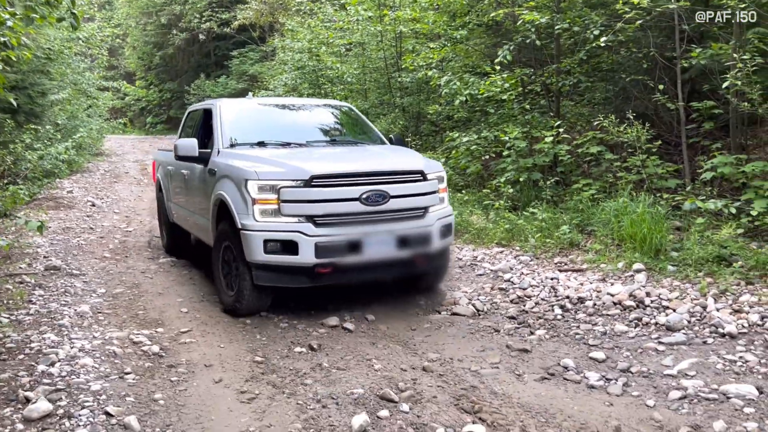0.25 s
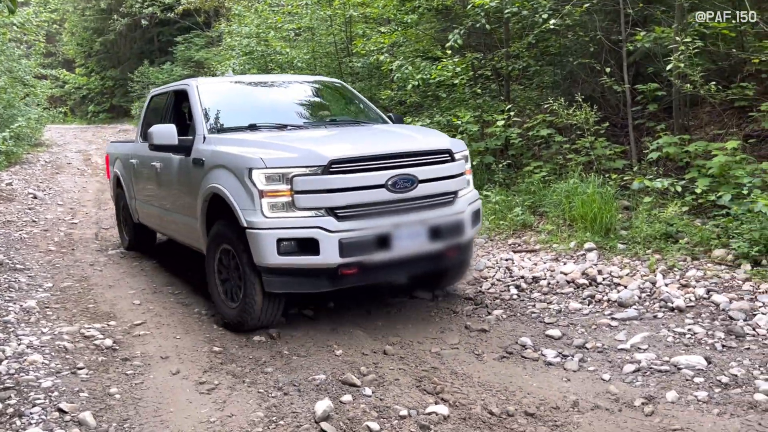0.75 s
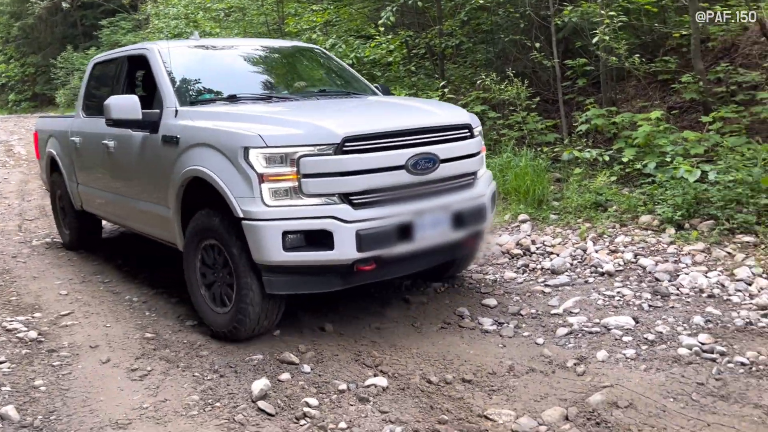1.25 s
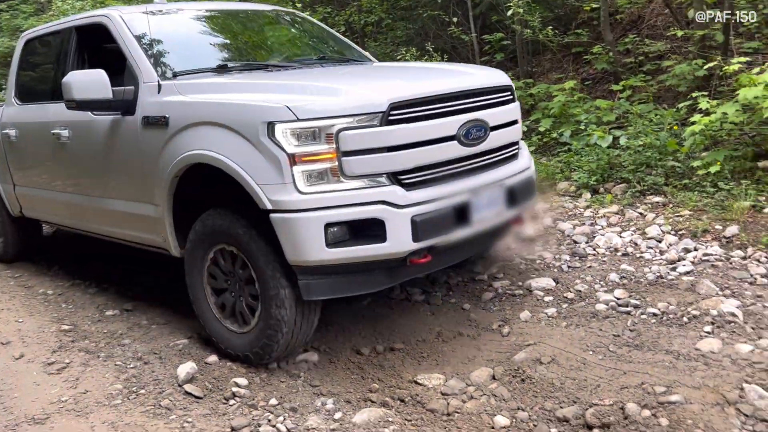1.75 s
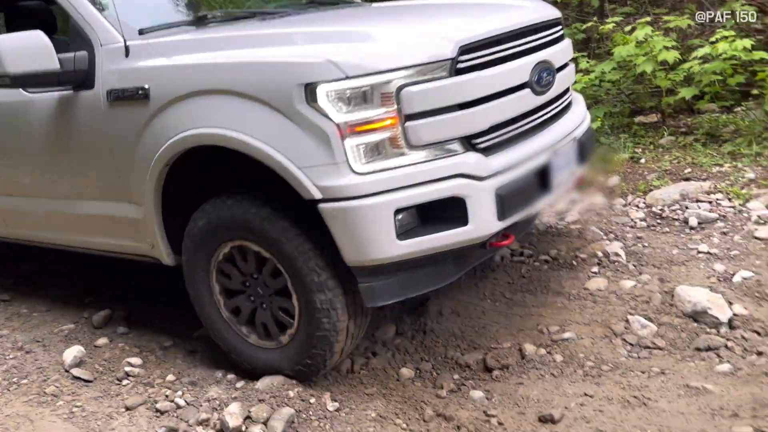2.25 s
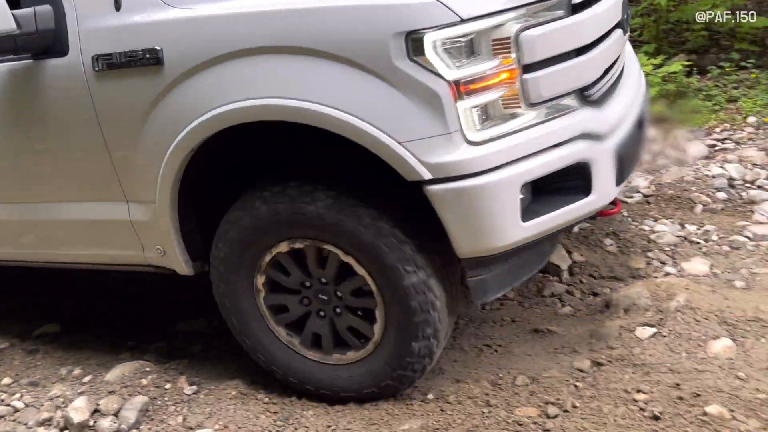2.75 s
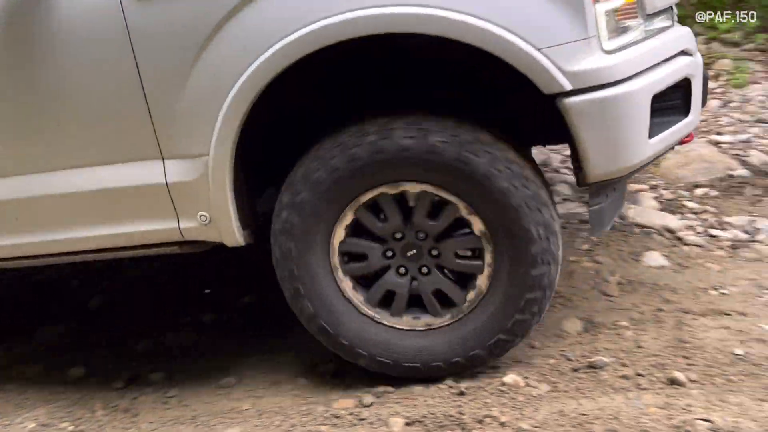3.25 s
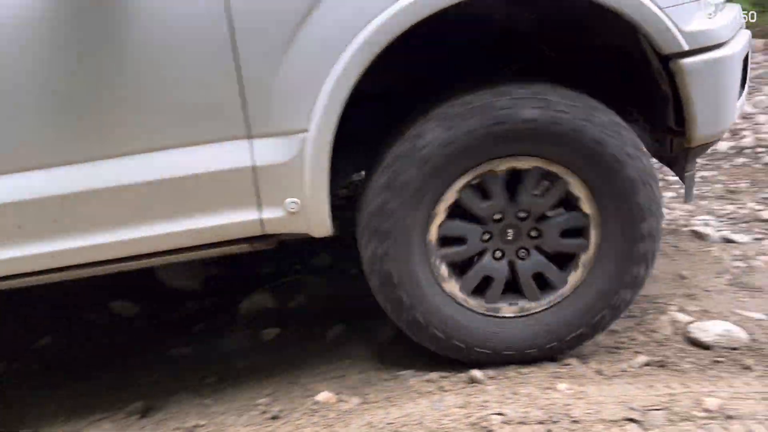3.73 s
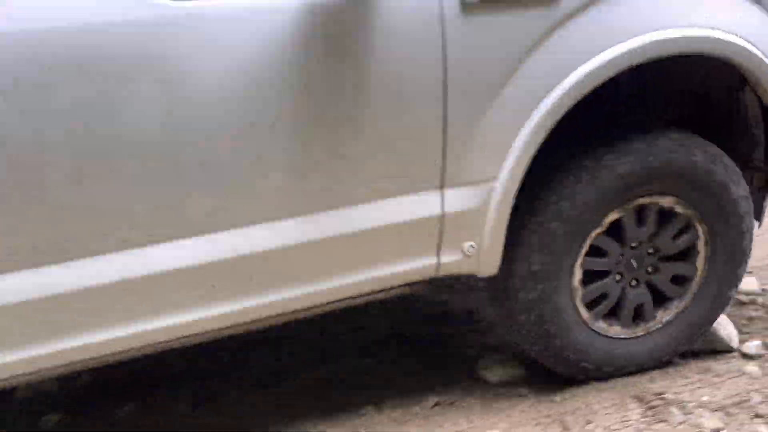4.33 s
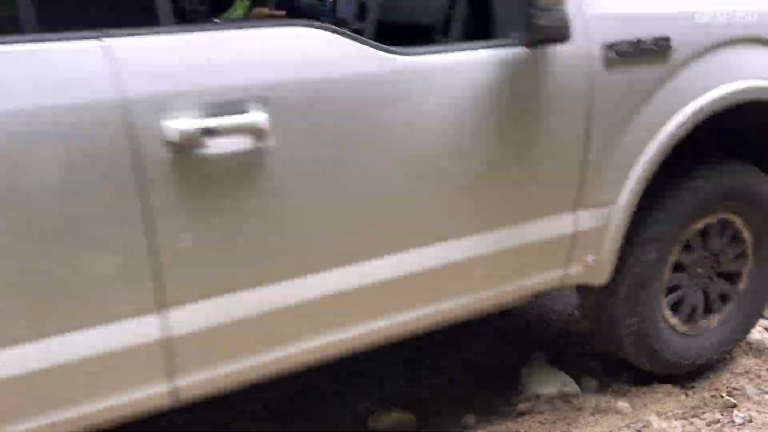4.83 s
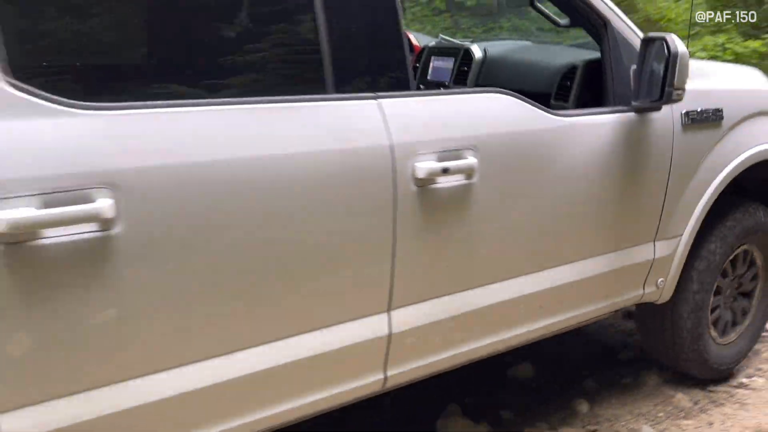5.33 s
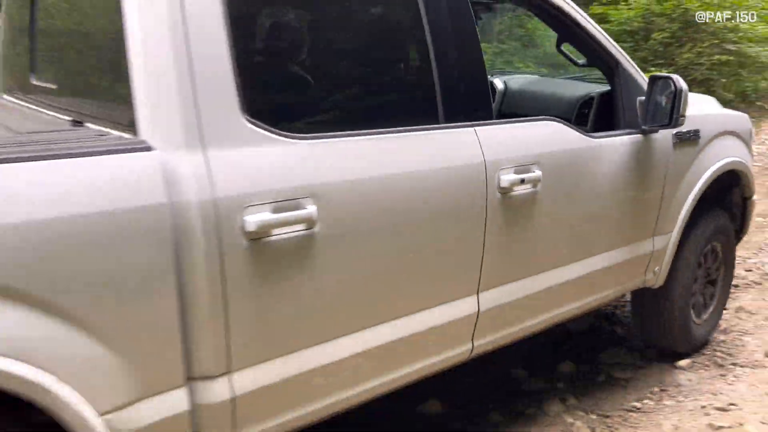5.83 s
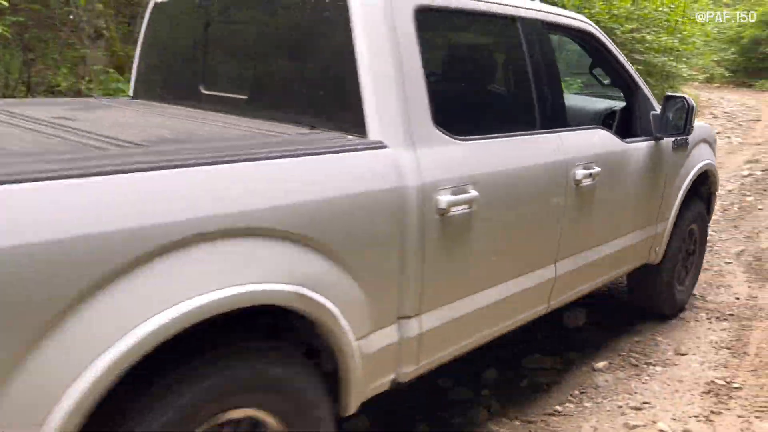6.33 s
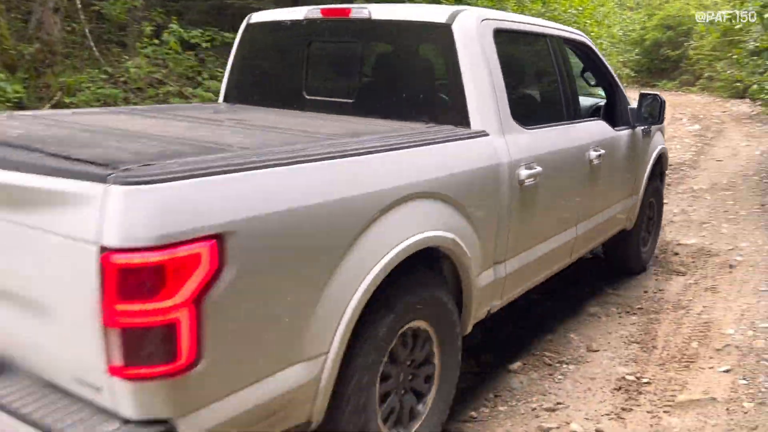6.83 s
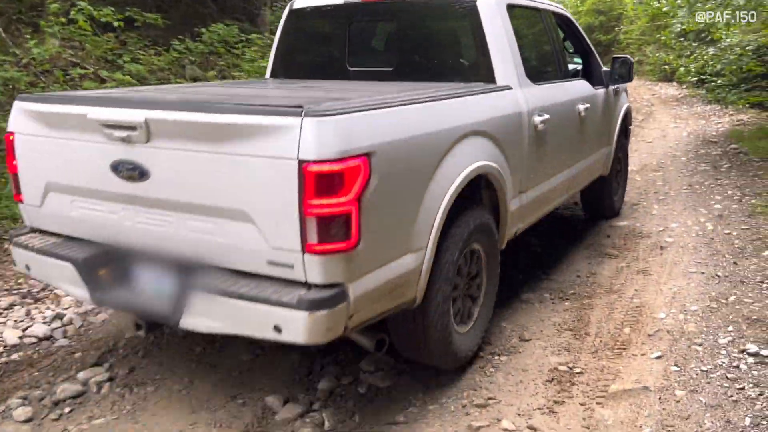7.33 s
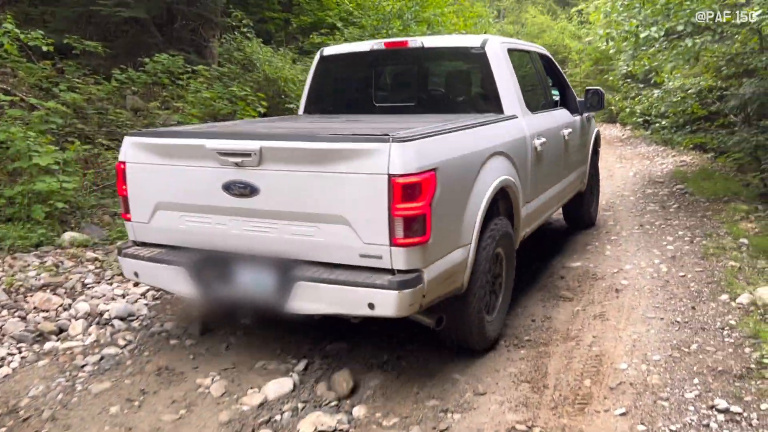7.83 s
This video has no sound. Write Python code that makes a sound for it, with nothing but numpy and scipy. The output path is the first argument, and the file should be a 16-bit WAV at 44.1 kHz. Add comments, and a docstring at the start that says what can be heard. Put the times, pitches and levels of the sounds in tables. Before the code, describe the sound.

Slow tyres crunch loose gravel close by, rocks clack, wheels thud off larger stones, and a low throbbing engine rolls past and away.

```python
"""The tyres of a pickup truck crawl past, close by, over a rocky forest road: stones knock, crack and scrape.
Knocks, cracks and scrapes are short blows or slips that ring; gravel is many tiny ticks mixed with noise.
The wheels boom as they drop off larger rocks. The six-cylinder engine is a stack of sine waves that follows
the throttle, with a throbbing exhaust; the ground and the forest scatter the sound. On the left, a narrow
band of noise near 6 kHz drifts in pitch."""
import sys
import numpy as np
from scipy import signal
from scipy.fft import rfft, irfft, next_fast_len
from scipy.io import wavfile
from scipy.ndimage import uniform_filter1d

SR = 44100
rng = np.random.default_rng(int(sys.argv[2]) if len(sys.argv) > 2 else 0)


def pcm_store(signal):
    """Save signal as 16-bit PCM."""
    levels = np.round(np.clip(np.atleast_2d(signal), -1, 1) * 32767)
    wavfile.write(sys.argv[1], SR, levels.astype(np.int16).T)


N = 356372  # length in samples
TIME = np.arange(N) / SR  # seconds

# Levels in the tables are relative: the functions that use them may add a further gain.

# Surroundings
# fading of the forest scatter: pitch_hz, fade_by_60_db_s
FOREST = [(100, 0.3), (1000, 0.19), (4000, 0.16), (16000, 0.064)]
# echo of the rolling off the ground; its delay mostly shortens as the truck moves by:
# time_s, delay_ms, strength_0_to_1
GROUND_ECHO = [(0, 1.23, 0.67), (.9, 1.27, 0.35), (1.5, 1.2, 0.24), (2.5, 1.06, 0.2), (3.3, 0.98, 0.08),
               (3.9, 1.07, 0), (4.7, 1.02, 0), (5.25, 0.91, 0.3), (6, 0.67, 0.05), (7.6, 0.84, 0.03)]
ECHO_TOP_HZ = 3180  # the rough ground scatters the treble

# Narrow hiss
# narrow drifting hiss near 6 kHz on the left, before its flicker: time_s, level_db, centre_hz
HISS = [(0, -56, 5900), (1, -52, 5840), (2.3, -45.5, 5800), (3.5, -49.5, 5830), (5, -52.5, 6380),
        (5.6, -51.5, 6393), (6.2, -43, 6450), (6.7, -44, 6300), (7.2, -75, 6010), (8.08, -71, 5907)]
# shape of the hiss on each side of its centre: distance_from_centre_hz, level_db
HISS_SKIRT = [(20, 4), (350, 0), (700, -7), (1200, -16)]

# Engine
# firing rate, before a slight unsteadiness: time_s, firing_rate_hz
FIRING = [(0.0, 67.6), (0.55, 65.3), (1.0, 75.85), (1.3, 80.63), (1.75, 75.1), (2.35, 70.8), (2.78, 71.8),
          (3.22, 81.7), (3.46, 81.15), (3.8, 72.75), (4.16, 79.86), (4.5, 78.46), (5.08, 72.38), (5.35, 74),
          (5.75, 86.73), (6.0, 93.5), (6.25, 94.2), (6.57, 87.9), (6.8, 68.6), (7.18, 82.4), (7.38, 79.4),
          (7.88, 63.96), (8.08, 61)]
# the engine comes near and goes by, at cruising revs: time_s, firing_hum_db, overtones_db
ENGINE_PASS = [(0, -42, -55), (.08, -42.5, -46), (.5, -35, -42.5), (.85, -30, -41.5), (1.4, -26, -38),
               (2.3, -25, -35), (2.8, -19.5, -30), (3.7, -19, -33.5), (4.5, -23.5, -30), (5.1, -21, -30),
               (6.65, -19.5, -42.5), (6.95, -23.5, -39.5), (7.6, -21, -35.5), (8.08, -35.5, -43)]
# resonances of the engine bay that the overtones sweep through: pitch_hz, level_db
BLOCK = [(120, 20), (145, -15), (170, -16), (210, -12.5), (238, 0), (270, -5.5), (320, -20.5), (345, -12),
         (366, -1), (385, -8.5), (410, -9), (480, -10.5), (570, -18), (700, -9.5)]
# tailpipe tones, uneven between the two cylinder banks: multiple_of_firing_rate, level_db
PIPE = [(.5, -30), (1.5, 3), (2, -4.5), (2.5, -6), (3.5, -13), (4, -11.5)]
# how much of the tailpipe is heard: time_s, level_db
TAIL = [(0, -44), (2, -41.5), (5, -41), (6.3, -43), (6.8, -37.5), (7.3, -33.5), (7.8, -39.5), (8.08, -33)]
CRUISE_HZ = 75
HUM_DB_PER_HZ, BLOCK_DB_PER_HZ = -0.2453, 0.4129  # more throttle: less hum, stronger overtones

# Rolling tyres
# steady rolling, louder as each axle passes: time_s, stones_db, pebbles_db, grit_db
ROAD = [(0, -45, -52, -59), (.08, -35.5, -47, -48.5), (.66, -37, -42, -49), (.85, -28.5, -35.5, -41.5),
        (1.1, -33.5, -35.5, -41), (1.55, -31.5, -38, -44.5), (2.25, -28.5, -37.5, -40.5),
        (2.7, -28, -32.5, -37), (3.55, -22, -31, -38), (4, -29, -32.5, -41.5), (4.35, -22.5, -31.5, -37),
        (5.05, -28.5, -35.5, -42.5), (5.75, -28.5, -36.5, -41.5), (6.05, -20, -33.5, -36),
        (6.6, -21, -31, -41.5), (6.95, -29, -39.5, -42.5), (7.4, -29, -38, -45), (7.55, -30, -37.5, -47.5),
        (7.8, -41, -43.5, -50.5), (8.08, -36.5, -40.5, -52.5)]
# the ground shakes as the axles pass: time_s, level_db
GROUND = [(0, -52), (2.6, -42), (3.7, -42), (4.05, -36.5), (4.3, -30.5), (4.85, -30.5), (5.2, -40.5),
          (5.7, -36), (6.3, -28), (6.7, -28), (7.1, -41), (7.75, -43), (8.08, -53)]
# tyre crushing a patch of loose gravel: start_s, length_s, level_db, grit_against_stones_db
CRUNCHES = [(0.693, 0.076, -22.5, -19.5), (0.81, .05, -27.5, -20), (0.91, 0.03, -27, -11),
            (1.174, 0.049, -24, -19), (1.662, 0.076, -26, -13), (2.305, 0.23, -24.5, -12),
            (2.596, 0.049, -20, -17), (2.743, 0.15, -27, -17), (3.329, 0.13, -21.5, -17),
            (4.148, 0.17, -15.5, -18), (4.262, 0.11, -23.5, -4.5), (4.399, 0.11, -24.5, -11.5),
            (4.645, 0.068, -14.5, -14), (4.673, 0.21, -21, -14), (5.163, 0.06, -19, -31),
            (5.246, 0.043, -19, -28), (5.544, 0.12, -24, -17.5), (5.817, 0.13, -19.5, -15),
            (5.969, 0.081, -23.5, -9.5), (6.196, 0.14, -20.5, -21), (6.385, 0.17, -18.5, -25),
            (6.566, 0.071, -23, -6), (6.637, 0.13, -18, -23), (7.06, 0.17, -27, -15.5),
            (7.167, 0.035, -23.5, -13), (7.293, 0.084, -24, -12), (7.58, 0.19, -26, -32),
            (7.868, 0.099, -24.5, -19.5)]
CRUNCH_PEAK = 0.18  # share of its length at which a crunch is loudest
CRUNCH_PEBBLES_DB = -1  # against the mean of stones and grit
# spectra of the four layers of rolling: pitch_hz, level_db_per_hz
RUMBLE = [(24, -53), (31, -30), (40, -10), (48, -2.5), (62, -2.5), (100, -4), (150, -12), (250, -18)]
STONES = [(70, -22), (120, 1), (170, -1.5), (250, .5), (410, 1), (600, -4), (950, -9), (1300, -23),
          (2200, -37)]
PEBBLES = [(600, -12), (1000, 3.5), (1500, 2.5), (2150, -1.5), (2650, -11.5), (3400, -12), (4500, -17),
           (7000, -45)]
GRIT = [(2500, 9.5), (4000, 2), (6000, 1.5), (7200, 0), (8700, 0.5), (11500, -2.5), (13500, -7),
        (16000, -7)]
CLUMP_HZ, CLUMP_LONGEST_S = 32.2, 0.14  # how fast the crumbling flickers; its longest clump
SPRAY_DB, SPRAY_CRUNCH = -9.5, 2.04  # flung chips against the grit; how much more steeply they follow it

# Wheels
# wheel dropping off a rock: start_s, level_db, pitch_as_multiple_of_wheel_modes
THUMPS = [(0.703, -21.5, .7), (3.661, -17.5, 0.8), (4.184, -15, 0.96), (4.213, -10.5, 0.72),
          (4.307, -21, 0.8), (4.513, -26, .9), (4.743, -10, 0.74), (6.699, -11.5, 0.82), (7.066, -13, 0.72),
          (7.578, -7.5, 1.0)]
# modes of tyre and wheel arch, before the pitch multiple: pitch_hz, level_db, fade_by_60_db_s
WHEEL = [(62.6, -15, 0.072), (112.7, -6.5, 0.25), (154.5, 4.5, 0.071), (225, -2, 0.081),
         (339.4, 4.5, 0.069), (363, 2, 0.027)]
JOLT_DB, JOLT_S = -21.5, 0.048  # rumble after a drop, against the drop; time to its peak

# Loose rocks
# stones knocked together under a tyre: start_s, level_db, pitch_hz, ring_cycles
KNOCKS = [(.07, -19, 1000, 0.8), (.1, -20, 950, 1.5), (0.155, -15, 1100, 1.1), (.156, -15, 430, 1.4),
          (.169, -23, 900, 1), (0.194, -21, 905, 1.3), (.33, -23, 1100, 0.93), (.39, -14.5, 1350, 1.3),
          (0.7, -10, 1320, 0.93), (0.704, -24, 900, 0.6), (.731, -18, 800, .8), (.829, -16, 1600, 1),
          (.849, -9.5, 604, 1.34), (.921, -16, 750, 1.2), (.933, -14, 950, 1.1), (.994, -12.5, 840, 1.4),
          (1.039, -12, 800, 1.2), (1.175, -15, 900, 0.85), (1.193, -11.5, 750, 1.2), (1.2, -14, 1500, 1.2),
          (1.49, -21, 800, 0.66), (1.673, -15, 603, 1.5), (1.745, -18.5, 1390, 1), (1.971, 1.5, 873, 0.83),
          (1.977, 0, 625, 1.1), (2.009, -9.5, 630, 2.3), (2.045, -7, 640, 1.2), (2.057, -9, 570, 2),
          (2.325, -9, 980, 0.89), (2.393, -9, 600, 0.58), (2.479, -17, 1400, 1), (2.525, -13, 700, 1.4),
          (2.593, 0.5, 1060, 0.9), (2.599, -5, 1130, 1.8), (2.614, -15, 750, 1), (2.626, -10.5, 543, 1.8),
          (2.638, -7.5, 1200, .8), (2.643, -16, 560, 1.8), (2.685, -6.5, 750, 0.58), (2.69, -7, 526, 1.6),
          (2.754, -5.5, 1060, 0.67), (2.771, -10, 1098, 0.93), (2.794, -13, 1200, 0.87),
          (2.802, -4.5, 1110, 0.67), (2.807, -19, 430, 1.2), (2.904, -7, 564, 0.4), (2.933, -7, 900, 0.77),
          (2.985, -10.5, 488, 1.3), (3.037, -2.5, 476, 0.95), (3.184, -11, 560, 1.1),
          (3.347, -8.5, 420, 1.4), (3.392, -8, 480, 1), (3.612, -7, 457, 1), (3.632, -5, 430, 1.3),
          (3.647, -4.5, 760, 0.99), (3.733, -7, 470, 1.1), (3.819, -5, 520, 0.43), (3.919, -9, 530, 1.9),
          (3.978, -18, 684, 1.5), (4.086, -6.5, 490, 0.72), (4.181, -4.5, 434, 2.18), (4.195, -6, 505, 1.2),
          (4.217, -4, 750, 0.85), (4.243, -5, 653.3, 1), (4.255, -5, 960, 1.3), (4.26, -4, 1000, 0.8),
          (4.274, -13, 696, 1.2), (4.472, -11.5, 700, 1), (4.648, -4.5, 1240, 1.5), (4.659, 0, 1210, 1.2),
          (4.667, -1.5, 567, 1.84), (4.673, -9, 900, 1.1), (4.69, -18, 1100, 0.87), (4.702, -12, 900, 1),
          (4.741, -18, 495, 1.4), (4.912, -11.5, 885, 0.65), (5.166, -5, 848, 1), (5.178, -7, 898, 1.2),
          (5.188, -9, 650, 1.8), (5.207, -11, 470, 1.1), (5.261, -5, 693, 1.1), (5.427, -14, 700, 0.7),
          (5.62, -11, 956, 1), (5.842, -16, 700, 1), (5.863, -8, 516, 1.34), (5.889, -0.5, 584, 0.74),
          (5.987, -3.5, 587, 1.8), (6.021, -2, 581.4, 1.3), (6.04, -14, 620, 1.5), (6.07, -9, 541, 1.25),
          (6.12, -12, 800, 1), (6.226, -6.5, 600, 1.15), (6.236, -5, 455.3, 1.8), (6.259, -6, 445, 1),
          (6.329, -3, 462.6, 1.6), (6.364, -4.5, 445.4, 1), (6.582, -5, 822, 1.2), (6.665, -7, 891, 0.68),
          (6.694, -5.5, 434, 2), (7.09, -13, 450, 1.69), (7.136, -15, 950, 0.8), (7.193, -13, 1398, 0.82),
          (7.238, -11.5, 400, 1.7), (7.412, -9.5, 601, 0.71), (7.444, -11.5, 419, 1.4),
          (7.557, -21, 650, 0.77), (7.58, -11, 555, .9), (7.615, -12.5, 905, 1.03), (7.65, -24, 699, 0.99)]
# muffling of the knocks by the rubber: pitch_hz, level_db
KNOCK_COLOUR = [(60, 7.5), (1500, -5.0), (3000, -6), (6000, -37), (16000, -40)]
# stones that crack or flick away: start_s, level_db, pitch_hz, ring_cycles
CRACKS = [(.391, -40, 2500, 0.51), (.696, -30, 4020, .8), (0.703, -24.5, 3200, 0.47),
          (0.815, -20, 3020, 0.36), (.816, -22, 5500, 3), (.824, -30, 5600, 3), (0.932, -24, 4200, 1.1),
          (.994, -34, 2800, 1.5), (1.971, -19.5, 5500, 0.83), (1.979, -27, 5610, 2), (2.261, -32, 5900, 1),
          (2.347, -22, 5900, 2), (2.6, -17.5, 3190, 0.44), (2.615, -23, 3000, .7), (2.638, -17, 2200, 1.6),
          (2.659, -20, 5400, 1.7), (2.695, -22, 4470, 1.2), (2.756, -19.5, 3300, 0.66),
          (2.802, -12, 3400, 0.3), (2.803, -15.5, 5600, 3.6), (2.903, -17.5, 4300, 2),
          (2.964, -25, 5000, 1.5), (2.989, -27, 6100, 2.5), (3.418, -22, 4000, 0.88),
          (4.212, -23, 3287, 1.5), (4.252, -18, 3300, 0.54), (4.286, -19, 3700, 1.4),
          (4.298, -21, 3040, .7), (4.326, -19, 3300, 0.92), (4.649, -8.5, 3600, 0.57),
          (4.654, -12, 2775, 0.64), (4.662, -18, 3300, .7), (4.67, -27, 4000, .7), (5.164, -18, 2800, 0.74),
          (5.167, -26, 7910, 0.75), (5.557, -25, 6500, 0.66), (5.618, -21.5, 2860, .6),
          (5.84, -34, 2702, .6), (5.861, -16, 6020, 1.2), (5.869, -14.5, 3000, .6), (5.871, -11, 5330, 1.7),
          (5.889, -20, 2500, .8), (6.016, -18.5, 3050, 0.67), (6.211, -23, 5290, 0.48),
          (6.385, -26, 6400, 1.2), (6.528, -22, 6100, 0.82), (6.58, -20, 4530, .6),
          (6.592, -35, 7500, 0.64), (6.85, -42, 9700, 0.67), (6.856, -24, 3777, 0.64), (7.0, -30, 3898, .6),
          (7.025, -26, 9480, 0.65), (7.054, -23, 9580, 0.61), (7.118, -25, 3200, 0.71),
          (7.155, -36, 7560, .6), (7.26, -24, 3220, 1.3)]
# tone of the cracks: pitch_hz, level_db
CRACK_COLOUR = [(300, 17), (2500, 4), (5000, -1.5), (6100, 2.5), (7200, 0), (16000, 7)]
# rock sliding on rock: start_s, length_s, level_db, pitch_hz, power_that_widens_the_ring
SCRAPES = [(2.925, 0.019, -26.5, 1810, .9), (4.286, 0.055, -28.5, 2280, .95),
           (4.402, 0.07, -24.5, 2180, .85), (4.645, 0.019, -23.5, 2260, 1), (4.691, .06, -28.5, 2106, 1),
           (4.782, 0.059, -29.5, 2320, 1), (5.16, .0097, -24, 2520, 1.1),
           (5.178, 0.0034, -16.5, 2500, 1.35), (5.184, 0.0051, -17, 2450, 1.35),
           (5.202, 0.0095, -27.5, 2550, 1.3), (5.257, 0.012, -25, 2520, 1.2), (5.277, .012, -35, 2450, 1.1),
           (6.582, 0.028, -29.5, 2093, 1.1), (7.186, 0.015, -32.5, 2010, 1.1),
           (7.259, 0.0071, -31, 2550, 1.4)]
# ring of the sliding rock, before widening: multiple_of_pitch, level_db_per_hz
SCRAPE_COLOUR = [(.35, -11), (.6, -22), (.8, -5), (.95, 1), (1.12, 0.5), (1.35, -15.5), (1.8, -26.5),
                 (4, -31.5), (7, -56)]
KNOCK_SETTLE_S, CRACK_SETTLE_S = 0.029, 0.01
TYRE_RING_DB, TYRE_RING_T60_S = -7, 0.034  # a knock sets the tyre ringing
TYRE_RING_HZ = 438  # each ring is scaled at random around this
# lesser stones tick at random: strongest level against the rolling, middle of the two-octave pitch range
SMALL_KNOCKS_PER_S, SMALL_KNOCK_DB, SMALL_KNOCK_HZ = 16, 4.5, 987
SMALL_SETTLE_S, SMALL_RING_CYCLES = 0.017, 1.26

# Two microphones
# likeness of left and right: pitch_hz, likeness_0_to_1
SAME = [(20, .998), (90, .995), (250, .93), (500, .82), (800, .62), (1400, .4), (2200, .6), (4200, .5),
        (5200, .2), (7000, .3), (8400, .85), (15000, .88)]
# loudness difference: pitch_hz, left_minus_right_db
LEAN = [(60, 1.5), (92, 1.5), (200, 3.2), (500, 2.2), (1200, 1.2), (2100, -1.7), (3000, 2), (4200, 5),
        (5200, 7), (6200, 10), (7000, 6.5), (7700, 1.5), (8400, 0), (15000, 0)]
# phase by which the left microphone leads: pitch_hz, lead_radians
LEAD = [(60, 0.31), (400, -0.061), (1200, 0.46), (1700, 1.14), (2400, 0.55), (3300, 1.63), (4400, 0.55),
        (7400, 1.8), (8400, 0.15)]
LAG_ABOVE_HZ, LAG_S = 8400, 0.000278  # the top octave reaches the left microphone late
EDGE_HZ = 15950  # upper band limit


def gain_of(db):
    """Turn decibels into a plain multiplier."""
    return 10 ** (np.asarray(db) / 20)


def evened(x):
    """Scale a signal to unit average strength (RMS)."""
    return x / np.sqrt(np.mean(x ** 2) + 1e-20)


def read(points, hz):
    """Read a table between its points, on a logarithmic pitch scale."""
    f, value = np.transpose(points)
    return np.interp(np.log(hz + 1), np.log(f + 1), value)


def curve(rows, order=1):
    """One column of a table, at every sample."""
    columns = np.transpose(rows)
    return np.interp(TIME, columns[0], columns[order])


def add(mix, s, sound):
    """Lay a sound into the mix from s seconds on, cut at the end."""
    part = mix[:, max(round(s * SR), 0):][:, :sound.shape[1]]
    part += sound[:, :part.shape[1]]


def wander(rate_hz):
    """Slow random movement of unit strength: noise with the fast changes removed."""
    hz = np.fft.rfftfreq(N, 1 / SR)[:N // 40]
    noise = rng.standard_normal((len(hz), 2)) @ [1, 1j]
    slow = irfft(noise / (1 + (hz / rate_hz) ** 4), next_fast_len(N, True))
    return evened(slow[:N])


def colour(x, spectrum):
    """Causal filter with the given spectrum, falling steeply beyond its ends."""
    hz = np.fft.rfftfreq(4096, 1 / SR) + 1
    beyond = abs(np.log2(hz / np.clip(hz, spectrum[0][0], spectrum[-1][0])))  # octaves
    log_gain = np.log(gain_of(np.maximum(read(spectrum, hz) - 24 * beyond, -100)))
    both_sides = np.r_[log_gain, log_gain[-2:0:-1]]
    # minimum phase: the filter responds as early as it can
    taps = np.fft.ifft(np.exp(np.conj(signal.hilbert(both_sides)))).real
    return signal.oaconvolve(x, taps[None, :2048], axes=1)[:, :x.shape[1]]


def spread(pair):
    """Mix two signals into two microphones whose likeness at each pitch follows SAME."""
    size = next_fast_len(pair.shape[1] + 256, True)
    a, b = rfft(pair, size)
    same = np.clip(read(SAME, np.fft.rfftfreq(size, 1 / SR)), -1, 1)
    mid = a * np.sqrt((1 + same) / 2)
    side = b * np.sqrt((1 - same) / 2)
    return irfft([mid + side, mid - side], size)[:, :pair.shape[1]]


def forest(x):
    """Thin scatter from the ground, the truck's flank and the trees: sparse random echoes that fade."""
    taps = rng.standard_normal((2, SR // 2)) * (rng.random((2, SR // 2)) < 2000 / SR)
    taps[:, :200] = 0
    hz, t, z = signal.stft(taps, SR, nperseg=256)
    fade = gain_of(-60 * t / read(FOREST, hz)[:, None])
    tail = spread(signal.istft(z * fade, SR, nperseg=256)[1])
    return signal.oaconvolve(x, tail / np.linalg.norm(tail[0]), axes=1)[:, :N]


def ground_echo(x):
    """A dull copy off the ground; its changing delay moves a comb of peaks through the sound."""
    size = next_fast_len(N, True)
    hz = np.fft.rfftfreq(size, 1 / SR)
    dull = irfft(rfft(x, size) / (1 + (hz / ECHO_TOP_HZ) ** 6), size)[:, :N]
    earlier = TIME - curve(GROUND_ECHO) / 1000
    delayed = np.array([np.interp(earlier, TIME, channel) for channel in dull])
    return curve(GROUND_ECHO, order=2) * delayed


def narrow_hiss():
    """Narrow noise near 6 kHz on the left that drifts in pitch and flickers in level."""
    a, b = colour(rng.standard_normal((2, N)), HISS_SKIRT)
    carrier = np.exp(2j * np.pi * np.cumsum(curve(HISS, order=2)) / SR)
    hiss = ((a + 1j * b) * carrier).real
    level = gain_of(curve(HISS) + 2.5 * wander(11))
    return level * evened(hiss) * np.array([[1], [0]])


def engine():
    """Tones at multiples of the firing rate, from block and tailpipe, each a little unsteady."""
    rate_hz = curve(FIRING)
    turns = np.cumsum(rate_hz * (1 + 0.00428 * wander(17.5))) / SR  # firing cycles so far
    throttle = rate_hz - CRUISE_HZ

    def partial(k, rough):
        """One tone at k times the firing rate, with wandering strength and phase."""
        jitter = (k - 1) * .08 * wander(16)  # uneven firings blur the higher orders
        strength = 1 + rough * wander(8.4)
        return np.sqrt(2) * strength * np.sin(2 * np.pi * (k * turns + rng.random()) + jitter)

    hum = gain_of(curve(ENGINE_PASS) + HUM_DB_PER_HZ * throttle) * partial(1, rough=0.07)
    block = sum(gain_of(read(BLOCK, k * rate_hz)) * partial(k, rough=0.25) for k in range(2, 9))
    block *= gain_of(curve(ENGINE_PASS, order=2) + BLOCK_DB_PER_HZ * throttle)
    pipe = sum(gain_of(db) * partial(k, rough=0.12) for k, db in PIPE)
    return hum + block + gain_of(curve(TAIL)) * pipe


def wheels():
    """Tyre and wheel arch boom when a wheel lands: a few fading tones."""
    out, t = np.zeros((2, N)), np.arange(SR // 3) / SR
    for s, db, pitch in THUMPS:
        boom = np.zeros(len(t))
        for hz, level, t60 in WHEEL:
            mode_hz = hz * pitch * rng.uniform(0.95, 1.02)
            boom += gain_of(level - 60 * t / t60) * np.sin(2 * np.pi * mode_hz * t)
        boom *= 1 - np.exp(-t / 0.0035)  # soft start
        add(out, s, gain_of(db + 2.0) * boom[None] / abs(boom).max() * np.ones((2, 1)))
    return out


def grains(lo_hz, hi_hz, per_s, range_db, cycles, count=14):
    """Stones of many sizes, each a tick of a few cycles; most are faint, a few strong."""
    out = np.zeros((2, N))
    for hz in np.geomspace(lo_hz, hi_hz, count):
        u = np.arange(int(8 * cycles * SR / hz) + 4) * hz / SR  # time in cycles
        chance, strength = rng.random(N), rng.exponential(1, 8192)
        at = np.flatnonzero(chance < per_s / count / SR)[:8192]
        train = np.zeros(N)
        train[at] = gain_of(range_db * np.minimum(strength[:len(at)], 3.5))
        tick = u * np.exp(-2 * u / cycles) * np.sin(2 * np.pi * (u + rng.random((2, 1))))
        out += np.sqrt(hz) * evened(signal.oaconvolve(train[None], tick, axes=1)[:, :N])
    return evened(out)


def tyre_work():
    """Strength of stones, pebbles, grit and rumble: steady rolling, plus each crunch and each jolt."""
    rolling_db = [curve(ROAD, order=1), curve(ROAD, order=2), curve(ROAD, order=3), curve(GROUND)]
    power = gain_of(rolling_db) ** 2
    for s, length, db, grit_db in CRUNCHES:
        swell = np.interp(np.arange(0, length, 1 / SR) / length, [0, CRUNCH_PEAK, 1], [0, 1, 0])
        levels_db = [[db], [db + grit_db / 2 + CRUNCH_PEBBLES_DB], [db + grit_db]]
        add(power[:3], s, gain_of(levels_db) ** 2 * swell)
    u = TIME[:SR] / JOLT_S
    for s, db, _ in THUMPS:
        add(power[3:], s, (gain_of([[db + JOLT_DB]]) * u * np.exp(1 - u)) ** 2)
    return np.sqrt(power)


def spray(grit):
    """Single chips spit out from under the tread, the more strongly the harder it grinds."""
    chips = grains(2100, 9500, per_s=130, range_db=4.0, cycles=2.6)
    level = gain_of(SPRAY_DB) * grit.max() * (grit / grit.max()) ** SPRAY_CRUNCH
    return level * evened(spread(colour(chips, GRIT)))


def gravel():
    """The tread breaks the gravel in clumps that shake stones, pebbles and grit together."""
    clumps = wander(CLUMP_HZ)
    clumps = evened(clumps - uniform_filter1d(clumps, size=int(CLUMP_LONGEST_S * SR)))
    strength = np.minimum(rng.exponential(1, N), 4)
    fractures = rng.standard_normal(N) * (rng.random(N) < 200 / SR) * gain_of(0.71 * strength)
    # brittle snaps, heard in stones, pebbles and grit
    snaps = evened(np.array([fractures, 0.086 * np.roll(fractures, 9)]))

    def layer(ticks, spectrum, wash, snap, clump_db):
        """Ticks, steady noise and snaps, flickering with the clumps."""
        sound = ticks + wash * rng.standard_normal((2, N)) + snap * snaps
        return evened(spread(colour(sound * gain_of(clump_db * clumps), spectrum)))

    rumble = evened(spread(colour(rng.standard_normal((2, N)), RUMBLE)))
    stone_ticks = grains(130, 1100, per_s=700, range_db=2.1, cycles=2.3)
    stones = layer(stone_ticks, STONES, wash=0.7, snap=0.8, clump_db=1.5)
    pebble_ticks = grains(914, 4980, per_s=900, range_db=1.9, cycles=3.0)
    pebbles = layer(pebble_ticks, PEBBLES, wash=1.6, snap=.7, clump_db=1.6)
    grit_ticks = grains(3430, 15200, per_s=1100, range_db=3.5, cycles=2.3)
    grit = layer(grit_ticks, GRIT, wash=1.9, snap=.35, clump_db=1.4)
    stones = stones + 0.51 * ground_echo(stones)
    pebbles = pebbles + ground_echo(pebbles)
    layers = [gain_of(-1.0) * stones, gain_of(-0.22) * pebbles, gain_of(-0.95) * grit, gain_of(6.5) * rumble]
    works = tyre_work()
    return sum(work * sound for work, sound in zip(works, layers)) + spray(works[2])


def blow(hz, settle, cycles, rattle, echo):
    """A stone snaps into place and chatters as it settles; every contact rings briefly."""
    t = np.arange(SR // 6) / SR
    slips = rng.standard_normal((2, len(t))) * (rng.random(len(t)) < 2500 / SR)
    slips *= gain_of(-60 * t / max(settle, .004)) * (t > .002)
    drive = rattle * slips / (np.linalg.norm(slips[0]) + 1e-9)
    drive[0, 0] += 1.35  # the first contact is the hardest
    drive[1, rng.integers(4, 90)] += echo * rng.choice([-1, 1])  # a glancing echo off the tyre
    u = t[:2048] * hz
    ring = u * np.exp(-2 * u / cycles) * np.sin(2 * np.pi * u)
    # the slope of the ring is used, as small things radiate no bass
    sound = spread(signal.fftconvolve(drive, np.gradient(ring)[None], axes=1))
    loudest = uniform_filter1d(sound.mean(0) ** 2, size=176).max()  # over about 4 ms
    return sound / np.sqrt(loudest)


def small_knocks():
    """Lesser stones at random moments, their level following the rolling."""
    rolling_db = curve(ROAD)
    rows = []
    for when, weak, pitch in rng.random((int(SMALL_KNOCKS_PER_S * N / SR), 3)):
        db = rolling_db[int(when * N)] + SMALL_KNOCK_DB - 6 * weak
        hz = SMALL_KNOCK_HZ * 2 ** (2 * pitch - 1)
        rows.append((when * N / SR, db, hz, SMALL_RING_CYCLES, SMALL_SETTLE_S))
    return rows


def knocks(out):
    """Stones knock together, muffled by the rubber, and set the tyre ringing."""
    t = np.arange(SR // 6) / SR
    for s, db, hz, cycles, settle in [(*row, KNOCK_SETTLE_S) for row in KNOCKS] + small_knocks():
        knock = blow(hz, settle, cycles, rattle=.6, echo=0.23)
        tyre_hz = TYRE_RING_HZ * rng.uniform(0.7, 1.31)
        tyre = gain_of(TYRE_RING_DB - 60 * t / TYRE_RING_T60_S) * np.sin(2 * np.pi * tyre_hz * t)
        add(out, s, gain_of(db - 7.0) * colour(knock[:, :len(t)] + tyre, KNOCK_COLOUR))


def cracks(out):
    """Stones crack or flick away: bright blows that settle fast."""
    for s, db, hz, cycles in CRACKS:
        crack = blow(hz, CRACK_SETTLE_S, cycles, rattle=.65, echo=0.5)
        add(out, s, gain_of(db - 8.0) * colour(crack, CRACK_COLOUR))


def scrapes(out):
    """Rock sticks and slips on rock: sharp slips over a thin rasp make it ring."""
    t = np.arange(SR // 6) / SR
    for s, length, db, hz, width in SCRAPES:
        slips = rng.standard_normal((2, len(t))) * (0.34 + (rng.random(len(t)) < 500 / SR) * 2.9)
        slips *= np.sqrt(np.sin(np.pi * np.minimum(t / length, 1) ** 0.8).clip(0))  # swell and fade
        slips[1] *= .6  # mostly from straight ahead
        ring = colour(slips, [(k ** width * hz, level) for k, level in SCRAPE_COLOUR])
        add(out, s, gain_of(db) * np.sqrt(length / t[-1]) * evened(spread(ring)))


def loose_rocks():
    """Dull knocks that ring the tyre, sharp cracks and short stick-slip scrapes."""
    out = np.zeros((2, N))
    knocks(out)
    cracks(out)
    scrapes(out)
    return out


def scene():
    """Narrow hiss, engine, rolling gravel and hits; the forest scatters the hits."""
    hits = loose_rocks() + wheels()
    return narrow_hiss() + engine() + gravel() + hits + gain_of(-9.0) * forest(hits)


def record(dry):
    """The two microphones differ in colour and phase; the highest peaks are rounded off; then the band limit."""
    size = next_fast_len(N + 2048, True)
    hz = np.fft.rfftfreq(size, 1 / SR)
    late = np.pi * LAG_S * np.maximum(hz - LAG_ABOVE_HZ, 0)
    # half of each difference goes to the left, the opposite half to the right
    left = gain_of(read(LEAN, hz) / 2) * np.exp(.5j * read(LEAD, hz) - 1j * late)
    heard = irfft(rfft(dry, size) * np.array([left, 1 / left]), size)[:, :N]
    heard = heard / (1 + (heard / .93) ** 8) ** (1 / 8)
    band_limit = signal.firwin(511, EDGE_HZ, window=("kaiser", 9), fs=SR)
    return signal.oaconvolve(heard, band_limit[None], "same")


dry = scene()
out = record(dry)
pcm_store(out)
```